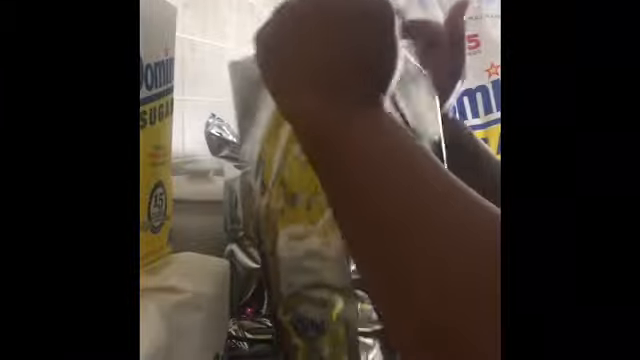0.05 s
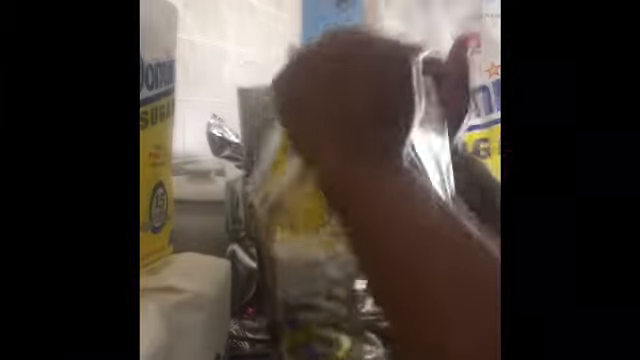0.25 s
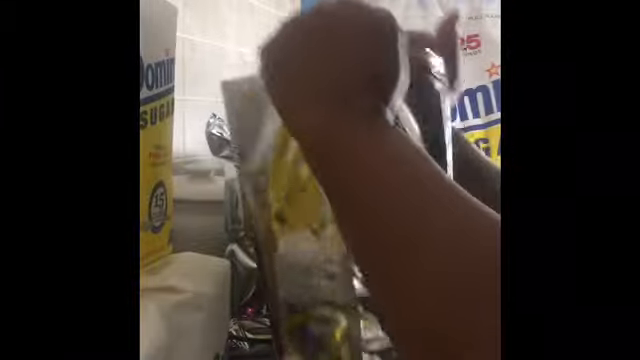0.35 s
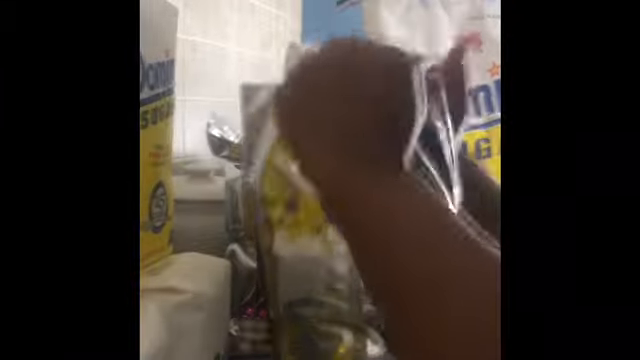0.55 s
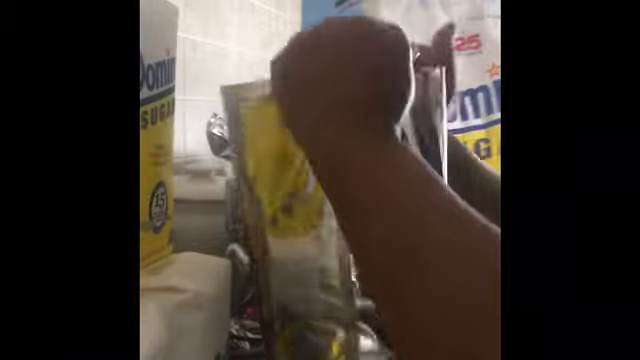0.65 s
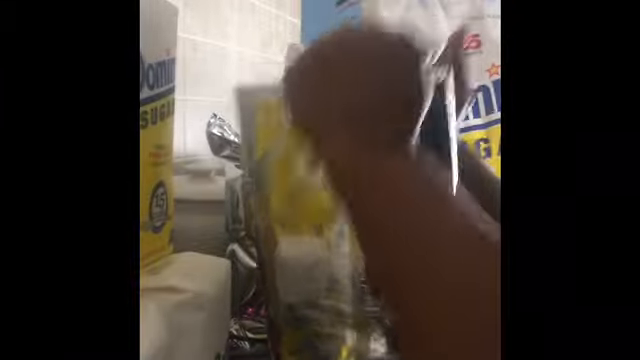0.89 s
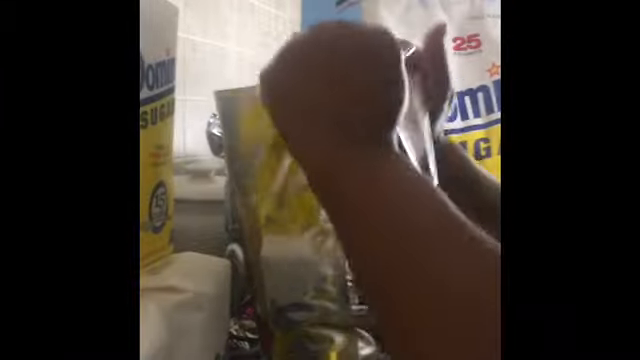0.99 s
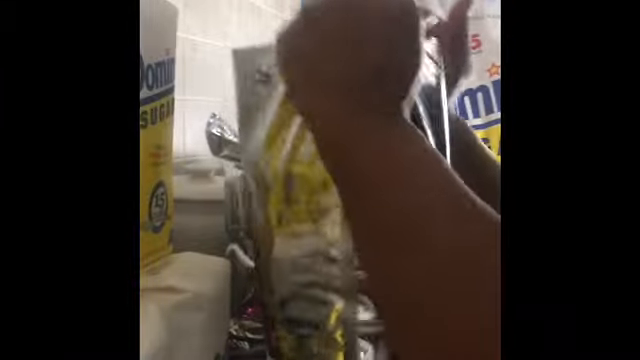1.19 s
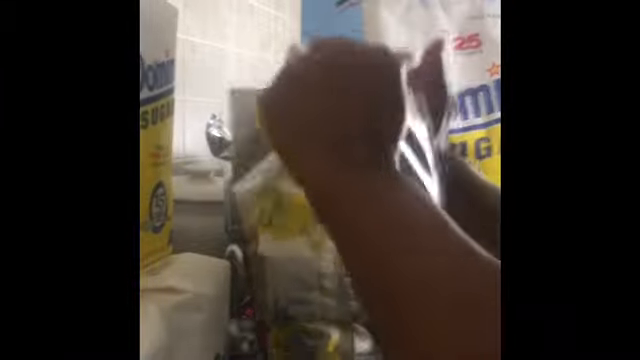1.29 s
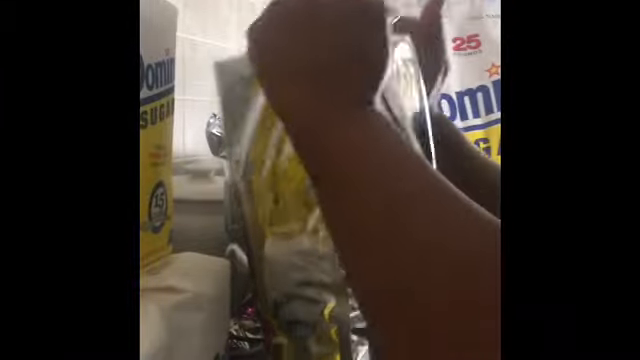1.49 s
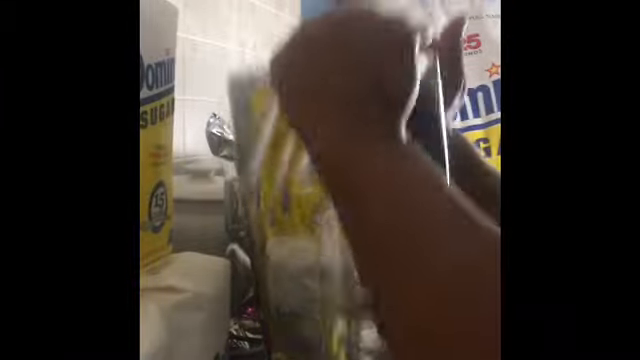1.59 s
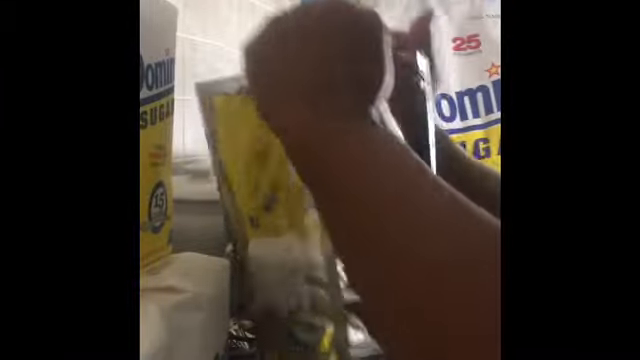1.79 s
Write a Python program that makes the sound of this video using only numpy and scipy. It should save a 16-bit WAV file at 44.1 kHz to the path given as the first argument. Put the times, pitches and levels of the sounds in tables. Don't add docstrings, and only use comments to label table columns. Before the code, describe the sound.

Close up in a kitchen, a sugar-filled foil bag gets a sharp knock and a booming slam amid crinkling, cuts suddenly to near quiet, then lands softly four times, each with paired clicks and a faint hollow ring.

```python
import sys
import numpy as np
from scipy import signal
from scipy.fft import rfft, irfft
from scipy.io import wavfile

SR = 44100
rng = np.random.default_rng(int(sys.argv[2]) if len(sys.argv) > 2 else 0)


def amplitude_ratio(level_db):
    exponent = np.asarray(level_db, float) / 20
    return 10 ** exponent


def master_out(mix):
    frames = np.transpose(np.atleast_2d(mix))
    ceiling = np.clip(frames, -1, 1)
    pcm = np.round(ceiling * 32767).astype(np.int16)
    wavfile.write(sys.argv[1], SR, pcm)


N = 81585


def evened(x):
    return x / np.sqrt(np.mean(x ** 2) + 1e-20)


def add(mix, start_s, sound):
    part = mix[round(start_s * SR):][:len(sound)]
    part += sound[:len(part)]


def curve(points):
    return amplitude_ratio(np.interp(np.arange(N) / SR, *np.transpose(points)))


def coloured(x, points):
    pitch_hz, level_db = np.transpose(points)
    bin_hz = np.fft.rfftfreq(N, 1 / SR)
    gain_db = np.interp(np.log(bin_hz + 1), np.log(pitch_hz + 1), level_db)
    return evened(irfft(rfft(x) * amplitude_ratio(gain_db), N))


def grains(per_s, spread_db, dense):
    chance, size, bed = rng.random(N), rng.exponential(1, N), rng.standard_normal(N)
    hits = (chance < per_s / SR) * amplitude_ratio(spread_db * np.minimum(size, 4)) * np.sign(bed)
    return evened(hits) + dense * bed[::-1]


def ring(modes):
    t = np.arange(SR) / SR
    return sum(amplitude_ratio(db - 60 * t / t60_s) * np.sin(2 * np.pi * hz * t) for hz, db, t60_s in modes)


def blow(modes, contact_s, peak_db):
    u = np.arange(0, 8 * contact_s, 1 / SR) / contact_s
    pulse = u ** 2 * np.exp(-2 * u)
    x = signal.fftconvolve(np.gradient(pulse), ring(modes))
    return amplitude_ratio(peak_db) * x / abs(x).max()


def blip(peak_db, hz, turns, rough):
    u = np.arange(0, 6 * turns / hz, 1 / SR) * hz
    band = signal.butter(3, [.4 * hz, min(1.45 * hz, 15000)], "band", fs=SR, output="sos")
    noise = signal.sosfilt(band, rng.standard_normal(3000))
    edge = evened(noise)[500:500 + len(u)]
    swell = u / turns * np.exp(1 - u / turns)
    return amplitude_ratio(peak_db) * swell * (np.sin(2 * np.pi * u) + rough * edge)


def add_shove(mix, peak_s, peak_db, hz, way=1):
    u = np.arange(-1.5 / hz, 1.5 / hz, 1 / SR) * hz
    shove = amplitude_ratio(peak_db) * np.cos(2 * np.pi * u) * np.exp(-((u + .08) / .55) ** 2)
    add(mix, peak_s - 1.5 / hz, way * shove)


# start_s, peak_db
SLAM_HIT = (.2055, -2)
# start_s, peak_db
CORNER_HIT = (.2006, -15)
# pitch_hz, level_db, t60_s
SLAM_BODY = [(53, -7, 0.37), (135, 4.5, 0.08), (166.1, -4, 0.041), (311.3, -10.5, 0.062),
             (469, -2.5, 0.025), (706.7, -5, 0.037), (886, 0, 0.048), (1120, -7, 0.015)]
# peak_s, peak_db, pitch_hz
COUNTER_REBOUND = (.2086, -3.5, 340)


def add_slam(mix):
    contact_s = 0.00086
    for start_s, peak_db in (SLAM_HIT, CORNER_HIT):
        add(mix, start_s, -blow(SLAM_BODY, contact_s, peak_db))
    add_shove(mix, *COUNTER_REBOUND)


# start_s, peak_db
KNOCK_HIT = (.0618, -19)
# pitch_hz, level_db, t60_s
KNOCK_BODY = [(231.4, 11.5, 0.15), (337, 19.5, .08), (651.6, 4.5, 0.064), (1057, 11.5, 0.1211),
              (1227, 22.5, 0.0305), (1440, 5.5, 0.094), (1629, 2.5, .08), (1920, 2.5, 0.16),
              (3080, -2, 0.046)]


def add_knock(mix):
    add(mix, KNOCK_HIT[0], blow(KNOCK_BODY, contact_s=.0003, peak_db=KNOCK_HIT[1]))


# time_s, level_db
HAND_FORCE = [(0, -43.5), (.028, -39), (.058, -48), (.064, -30), (.085, -36.5), (.14, -48), (.186, -52),
              (.196, -33), (.218, -26), (.265, -34.5), (.298, -31), (.345, -34)]
# pitch_hz, level_db
FOIL_TONE = [(180, -31.5), (300, 6), (470, -8.5), (565, -2.5), (1210, -4), (1970, -11), (3800, -17),
             (7000, -40.5), (16000, -60)]


def crumpling_foil():
    return curve(HAND_FORCE) * amplitude_ratio(-0.5) * coloured(grains(2500, spread_db=3.5, dense=0.2), FOIL_TONE)


# time_s, level_db
SIFT_LEVEL = [(0.0, -50), (0.058, -55.5), (0.066, -44), (0.162, -66.5), (0.182, -64), (0.22, -33),
              (0.264, -46), (0.33, -43), (0.345, -43)]
# pitch_hz, level_db
SIFT_TONE = [(2000, -30), (4000, -2.5), (6500, 1.5), (10500, -2.5), (13000, 0), (16000, -6)]


def sifting_sugar():
    return curve(SIFT_LEVEL) * amplitude_ratio(1.0) * coloured(grains(4000, spread_db=2.5, dense=0.4), SIFT_TONE)


# time_s, level_db
SHIFT_LEVEL = [(0, -41), (.06, -32.5), (.1, -39), (.185, -50), (.198, -27.5), (.235, -11), (.26, -27.5),
               (.31, -37.5), (.345, -30.5)]
# pitch_hz, level_db
SLUMP_TONE = [(15, -50), (28, 3), (55, 13.5), (146, -1.5), (195, 4.5), (290, -10), (468, -6.5),
              (1030, -21.5), (1500, -35), (1950, -64), (3300, -120)]


def slumping_sugar():
    return curve(SHIFT_LEVEL) * amplitude_ratio(-5.0) * coloured(grains(300, spread_db=4.0, dense=0.8), SLUMP_TONE)


# peak_s, peak_db, pitch_hz, way
SUGAR_LUMPS = [(.2023, -15, 330, 1), (.2070, -9, 420, -1), (.2385, -17, 200, -1), (.2575, -21, 250, 1),
               (.2655, -20, 160, -1), (.2710, -18, 170, 1), (.2843, -18, 300, 1), (.2930, -22, 150, -1),
               (.3050, -23, 70, 1), (.3170, -25, 75, -1), (.3255, -24, 230, 1), (.3430, -30, 160, 1)]


def add_lumps(mix):
    for row in SUGAR_LUMPS:
        add_shove(mix, *row)


# start_s, peak_db, pitch_hz
CREASE_CHIRP = (.232, -26, 3400)
# start_s, peak_db,
# pitch_hz
CREASE_POPS = [(.004, -47, 2600), (.0195, -37.5, 950), (.0215, -36, 800), (.0275, -38, 2570),
               (.0283, -34.5, 1250), (0.0627, -19.5, 1254), (.0745, -27, 1200), (.075, -38, 4500),
               (.0815, -37, 1100), (0.084, -34, 2900), (.091, -30, 1200), (.098, -36, 1100),
               (.103, -41, 1150), (.194, -33.5, 2570), (.1995, -33, 2800), (.209, -27, 1500),
               (0.2165, -20.5, 3900), (.218, -23.5, 2800), (.2195, -18.5, 950), (0.226, -23.5, 3600),
               (.2265, -27.5, 1100), (.232, -26, 1400), (.2405, -26, 1200), (0.245, -23.5, 1120),
               (0.251, -23.5, 1200), (.2565, -27.5, 2200), (.2765, -23.5, 1300), (.279, -29.5, 1300),
               (0.2903, -20.5, 1150), (.291, -30, 3300), (.2985, -25, 1500), (.3005, -29, 1700),
               (.3095, -27, 2800), (0.3125, -26, 1000), (.3175, -26.5, 1000), (.319, -28.5, 2700),
               (.324, -23.5, 1000), (.3365, -26, 1220)]


def add_creases(mix):
    add(mix, CREASE_CHIRP[0], blip(*CREASE_CHIRP[1:], turns=6.9, rough=0.12))
    for start_s, peak_db, hz in CREASE_POPS:
        add(mix, start_s, blip(peak_db, hz, turns=1.1, rough=0.34))


def loud_handling():
    foil_top_hz = 15700
    mix = crumpling_foil() + sifting_sugar()
    mix = signal.sosfilt(signal.cheby2(10, 40, foil_top_hz + 400, fs=SR, output="sos"), mix)
    mix += slumping_sugar()
    add_knock(mix)
    add_slam(mix)
    add_lumps(mix)
    add_creases(mix)
    fade_s, length_s, fade_db = 0.3406, 0.0253, -40.5
    return mix * curve([(fade_s, 0), (fade_s + length_s, fade_db), (fade_s + 3 * length_s, 2 * fade_db)])


# touch_s, weight_db, rebound_db, cupboard_ring_db, door_share_db
BOUNCES = [
    (.560, -42.5, -17, -71, 13.5),
    (0.92, -41, -21, -58.5, -3.5),
    (1.288, -41, -23, -56, -0.5),
    (1.641, -43, -22, -59.5, 2),
]


def bounce_force():
    rise_s, hold_s, fall_db_per_s = 0.013, 0.021, 381
    rebound_s, rebound_width_s = 0.11, 0.058
    t, force = np.arange(N) / SR, np.zeros(N)
    for touch_s, weight_db, rebound_db, _, _ in BOUNCES:
        u = t - touch_s
        release = amplitude_ratio(-fall_db_per_s * np.maximum(u - rise_s - hold_s, 0))
        settle = np.clip(u / rise_s, 0, 1) ** 0.64 * release
        rebound = amplitude_ratio(rebound_db) * np.exp(-((u - rebound_s) / rebound_width_s) ** 2)
        force += amplitude_ratio(weight_db) * (settle + rebound)
    return force


# pitch_hz, level_db
THUD_TONE = [(20, -9), (80, 9), (140, -12), (200, -7.5), (360, 1.5), (600, -14.5), (1100, -13), (1700, -28),
             (3500, -37), (6000, -49)]
# pitch_hz, level_db, t60_s
COUNTER_BODY = [(91, 1.5, 0.15), (197, -1, .11), (296.2, -6.5, 0.13), (363.4, -0.5, 0.13),
                (1150, -28, 0.044)]
# pitch_hz, level_db
GRIT_TONE = [(400, -20), (900, 0), (1500, -3), (3500, -8), (6500, -16), (12000, -22)]
# peak_s, peak_db, pitch_hz
LANDING_PUSHES = [(.5815, -28, 140), (.5963, -27, 190), (.6045, -33, 110), (.9428, -27, 190),
                  (.9570, -26, 210), (.9650, -34, 90), (1.3085, -26, 170), (1.3215, -28, 260),
                  (1.3292, -28, 170), (1.6640, -30, 110), (1.6780, -32, 250), (1.6870, -37, 100)]
# peak_s, peak_db, pitch_hz
AFTER_BUMPS = [(0.627, -48, 170), (0.647, -42, 190), (0.682, -47, 195), (0.707, -51, 181),
               (1.039, -47, 148), (1.06, -58, 300), (1.358, -42, 276), (1.403, -44, 90),
               (1.438, -53.5, 170), (1.72, -64, 300), (1.761, -50.5, 151), (1.789, -51, 130)]


def bounces():
    force = bounce_force()
    thud = coloured(grains(900, spread_db=-0.5, dense=0.9), THUD_TONE)
    rumble = grains(600, spread_db=2.0, dense=0.63)
    counter = evened(signal.oaconvolve(rumble, ring(COUNTER_BODY))[:N])
    grit = coloured(grains(700, spread_db=3.5, dense=.15), GRIT_TONE)
    mix = force * (thud + amplitude_ratio(1) * counter + amplitude_ratio(-24) * grit)
    for row in LANDING_PUSHES + AFTER_BUMPS:
        add_shove(mix, *row)
    return mix


# (peak_db, pitch_hz)
FOIL_SNAPS = [
    (.5792, -12, [(-26, 3500), (-22, 8500), (-35, 12800)]),
    (.6022, -15, [(-31, 3000), (-26, 6500), (-26, 9300), (-29, 12800)]),
    (.9397, -12, [(-22, 4500), (-30, 9800), (-27, 13500)]),
    (.9629, -16, [(-28, 3500), (-26, 6500), (-32, 11500)]),
    (1.3056, -12, [(-29, 3000), (-19, 6800), (-22, 13000)]),
    (1.3287, -14, [(-33, 2200), (-26, 4300), (-30, 6500), (-31, 9000), (-35, 13500)]),
    (1.6609, -11, [(-24, 5500), (-29, 9000), (-39, 13800)]),
    (1.6842, -16, [(-33, 2400), (-27, 4500), (-32, 7500), (-37, 11000), (-37, 14000)]),
    (1.6860, -30, [(-38, 4500), (-42, 8500), (-46, 13000)]),
]
# pitch_hz, level_db, t60_s
BAG_WALL = [(1154, -10.5, 0.0019), (2740, -4.5, 0.0006)]


def foil_snaps():
    rise_s = .000105
    mix, t = np.zeros(N), np.arange(200) / SR
    u = t / rise_s
    for start_s, wall_db, modes in FOIL_SNAPS:
        foil = np.zeros(200)
        for k, (peak_db, hz) in enumerate(modes):
            foil += (-1) ** k * amplitude_ratio(peak_db - .5) * np.sin(2 * np.pi * hz * t)
        foil *= u * np.exp(1 - u)
        tail = amplitude_ratio(-53 - 60 * t / 0.011) * rng.standard_normal(200)
        swing = ring(BAG_WALL)[:200] * np.minimum(u / 2, 1)
        add(mix, start_s, foil + amplitude_ratio(wall_db) * (tail - swing))
    return mix


# pitch_hz, level_db, t60_s
CUPBOARD_BODY = [(55.7, 11, 0.42), (155.3, 1.5, 0.49), (317, 4.5, 0.92)]
# pitch_hz, level_db, t60_s
DOOR_BODY = [(513, -4, .8), (743, -8, .45), (1100, -14, .2)]
# start_s, level_db
DOOR_HUM = (.36, -66)


def cupboard():
    delay_s, swell_s = .045, 0.0048
    mix, swell = np.zeros(N), np.minimum(np.arange(SR) / SR / swell_s, 1)
    for touch_s, _, _, ring_db, door_db in BOUNCES:
        body = ring(CUPBOARD_BODY) + amplitude_ratio(door_db) * ring(DOOR_BODY)
        add(mix, touch_s + delay_s, amplitude_ratio(ring_db) * swell * body)
    add(mix, DOOR_HUM[0], amplitude_ratio(DOOR_HUM[1]) * swell * ring(DOOR_BODY[:1]))
    return mix


# start_s, peak_db, pitch_hz
FOIL_TICKS = [(.435, -74, 1800), (.559, -69, 11000), (.987, -64, 11500), (1.147, -73, 9000),
              (1.19, -71, 9050), (1.281, -72, 8000), (.50, -75.5, 5700), (.564, -58.5, 2900),
              (.567, -63, 2700), (0.592, -57, 3100), (.685, -75, 1830), (0.788, -70.5, 1550),
              (0.925, -61.5, 2820), (0.933, -63, 1750), (0.948, -63, 2950), (0.953, -73, 3200),
              (0.986, -63.5, 6860), (1.148, -82, 3870), (1.189, -80, 2850), (1.29, -58.5, 2900),
              (1.318, -63, 3280), (1.328, -63, 3200), (1.41, -72, 4470), (1.512, -71, 1510),
              (1.646, -62, 3460), (1.672, -63, 2980), (1.689, -64, 2820), (1.720, -65, 1270),
              (1.726, -68, 6150), (1.730, -67, 3000), (1.652, -66, 6500), (1.764, -74, 3480)]


def foil_ticks():
    mix = np.zeros(N)
    for start_s, peak_db, hz in FOIL_TICKS:
        add(mix, start_s, blip(peak_db - 4.5, hz, turns=4., rough=2.5))
    return mix


# pitch_hz, level_db
ROOM_TONE = [(20, -10.5), (50, 4), (110, 0.5), (300, -2), (800, -8), (1400, -14.5), (12500, -24),
             (15700, -23), (16200, -62.5)]


def room_hiss():
    return amplitude_ratio(-68.5) * coloured(rng.standard_normal(N), ROOM_TONE)


def scene():
    bag = loud_handling() + bounces() + foil_snaps()
    return (bag + cupboard() + foil_ticks() + room_hiss())[None]


def top_cut(x):
    return signal.sosfilt(signal.butter(12, 16840, fs=SR, output="sos"), x)


def record(dry):
    low_cut_hz, top_hz = 30, 16300
    x = signal.sosfilt(signal.butter(2, low_cut_hz, "high", fs=SR, output="sos"), dry)
    x = signal.oaconvolve(x, signal.firwin(255, top_hz, window=("kaiser", 8), fs=SR)[None], "same")
    mix = np.clip(x, -.99, .99)
    return top_cut(mix)


dry = scene()
out = record(dry)
master_out(out)
```